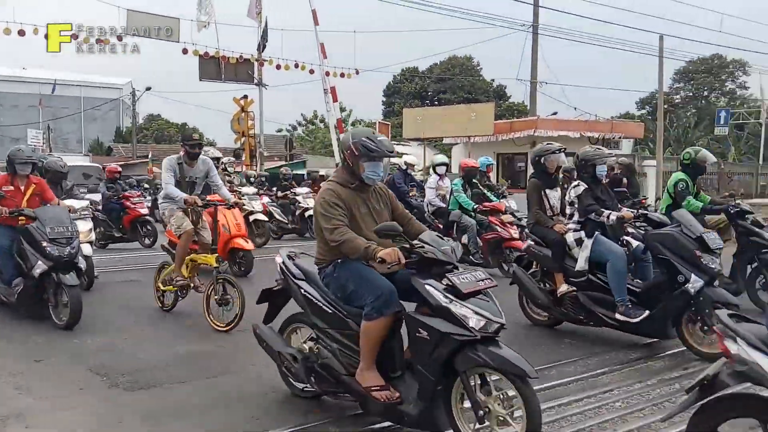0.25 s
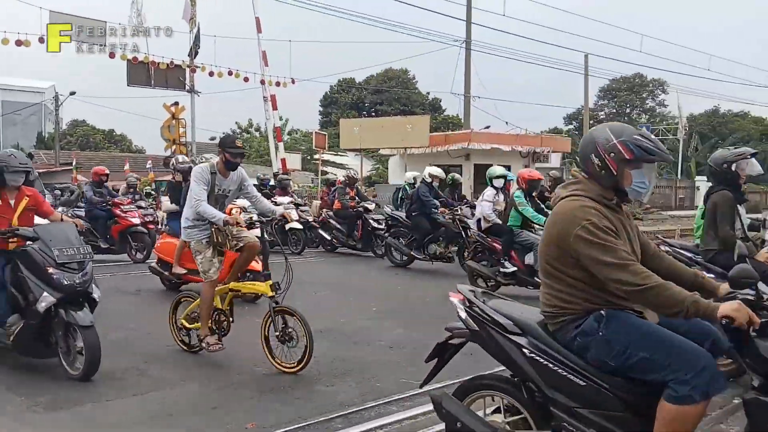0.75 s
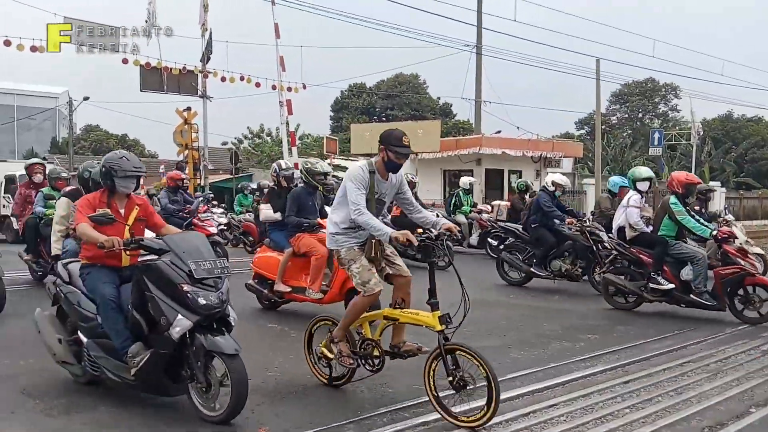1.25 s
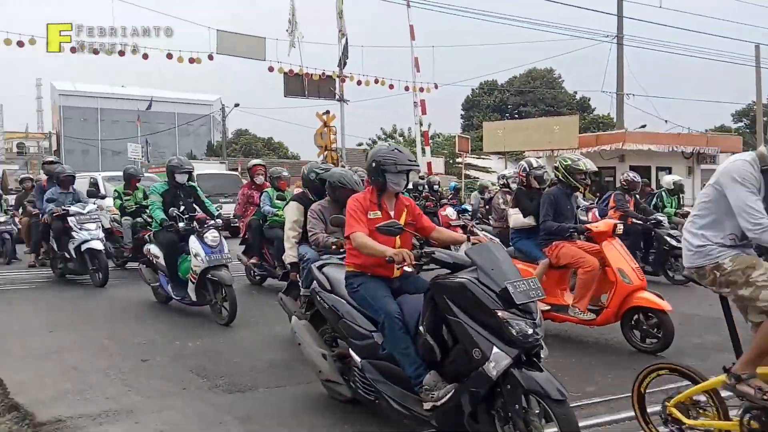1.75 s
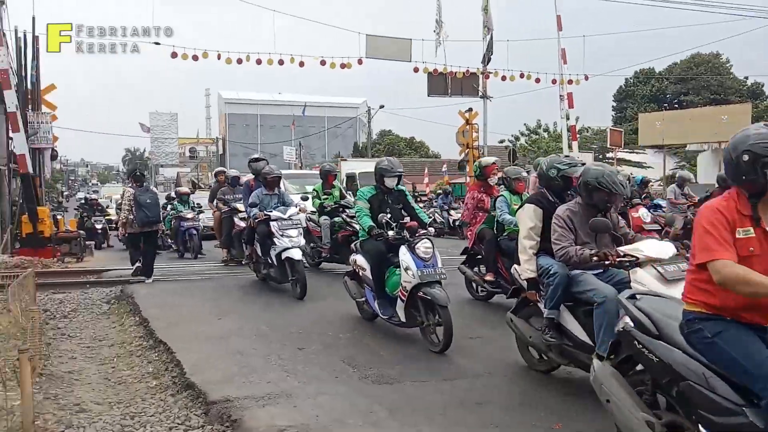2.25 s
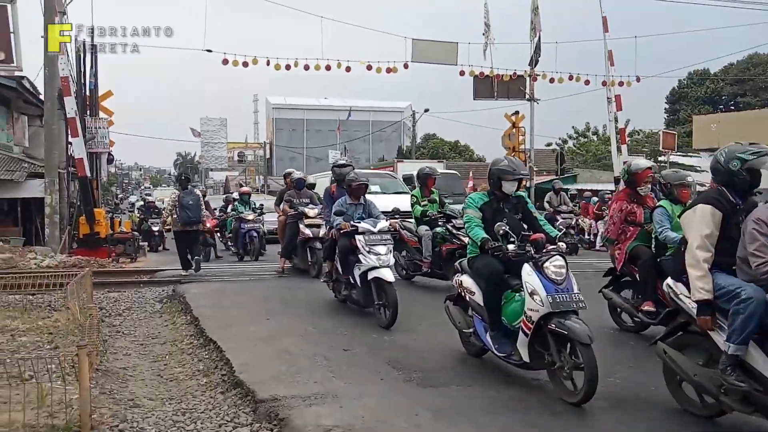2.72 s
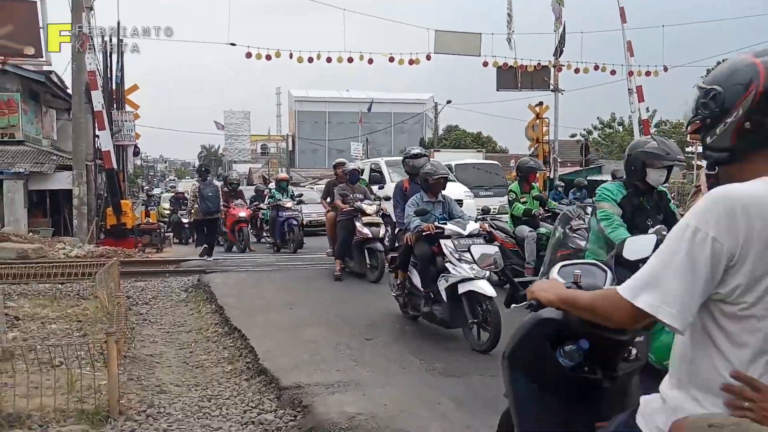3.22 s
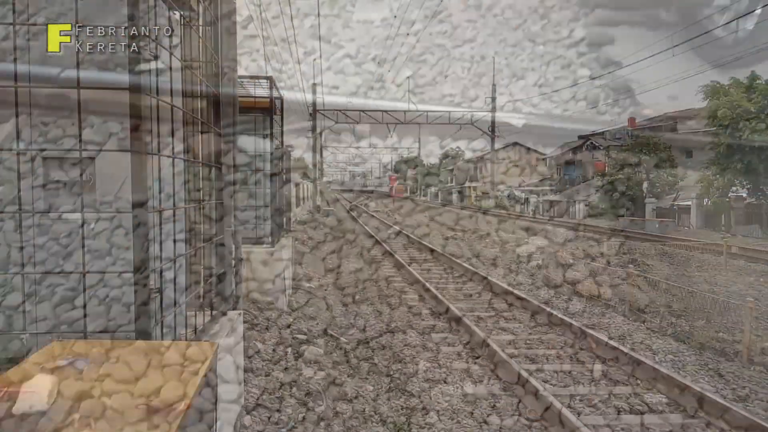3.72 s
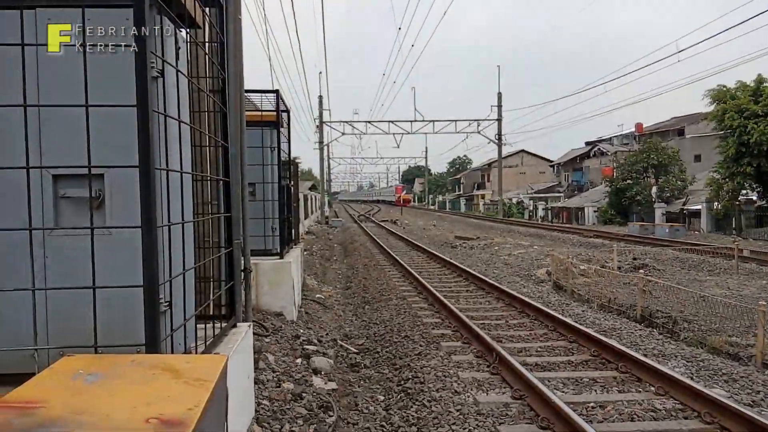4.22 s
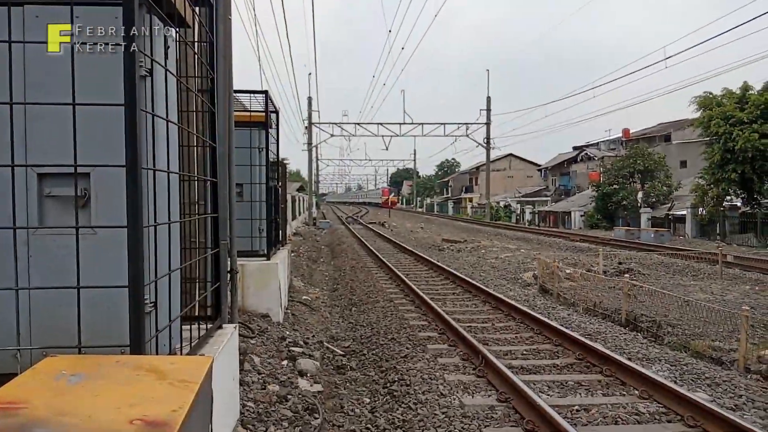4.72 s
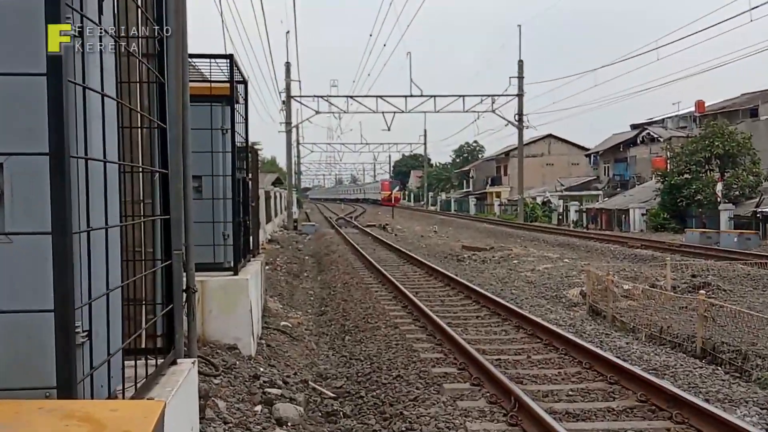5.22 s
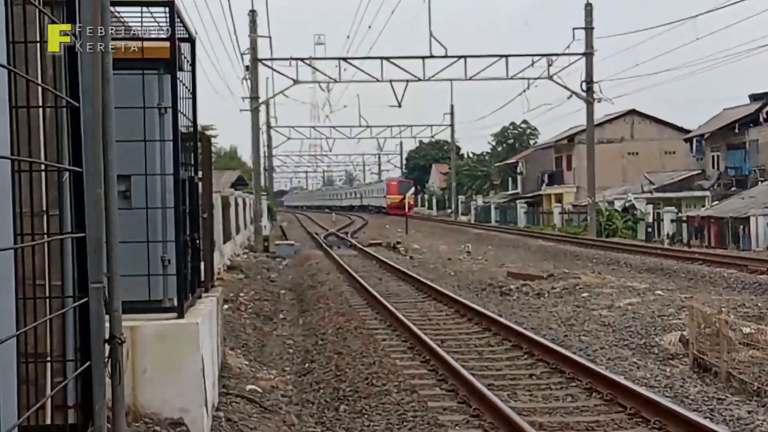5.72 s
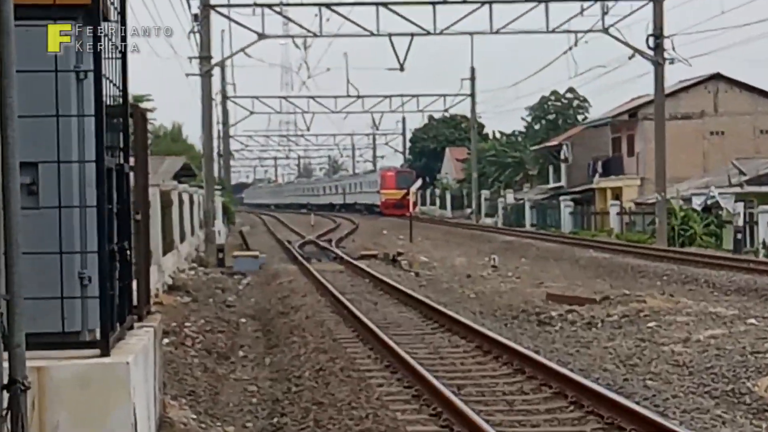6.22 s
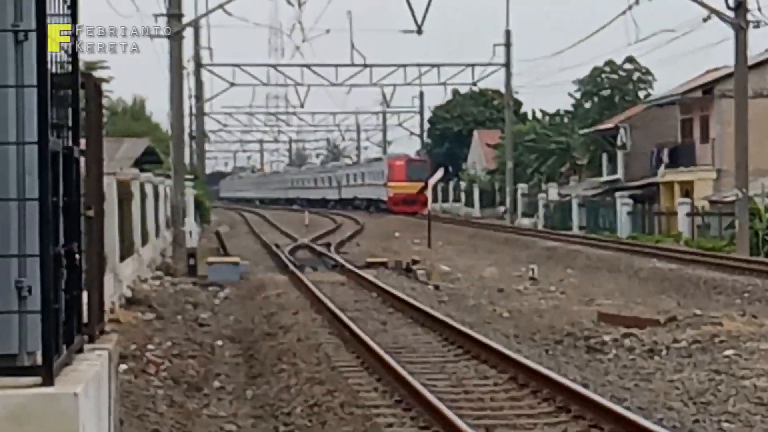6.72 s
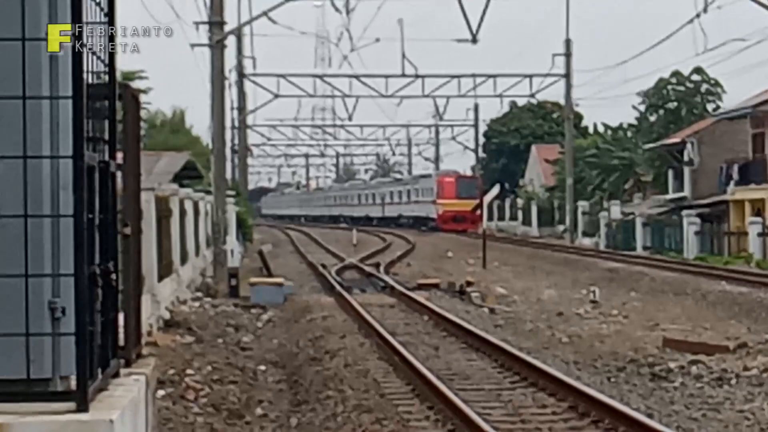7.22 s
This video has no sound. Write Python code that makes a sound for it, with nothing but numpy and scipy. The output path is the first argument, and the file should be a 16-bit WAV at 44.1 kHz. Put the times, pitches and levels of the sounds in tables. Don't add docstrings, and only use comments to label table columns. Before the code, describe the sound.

Dense scooter traffic buzzes past with hissing belts and small squeaks, cuts out briefly, then a deep thumping motorcycle engine idles and opens up.

```python
import sys
import numpy as np
from scipy import signal
from scipy.fft import rfft, irfft
from scipy.io import wavfile
from scipy.ndimage import uniform_filter1d

SR = 44100
rng = np.random.default_rng(int(sys.argv[2]) if len(sys.argv) > 2 else 0)


def bounce(signal):
    frames = np.transpose(np.atleast_2d(signal))
    limited = np.clip(frames, -1, 1)
    pcm = np.round(limited * 32767).astype(np.int16)
    wavfile.write(sys.argv[1], SR, pcm)


def rack_gain(trim_db):
    fader = np.asarray(trim_db, float)
    return 10 ** (fader / 20)


N = 328879
T = np.arange(N) / SR
CHANGE_S, BACK_S = 3.716, 3.802
FADE_IN_BASS_DB, FADE_IN_HISS_DB, FADE_IN_S = -22, -27, .095


def unit(x):
    return x / np.sqrt(np.mean(x ** 2))


def column(table, index):
    return np.interp(T, [row[0] for row in table], [row[index] for row in table])


def fade(start_s, end_s, edge_s):
    return np.clip(np.minimum(T - start_s, end_s - T) / edge_s + 1, 0, 1)


def fade_in(depth_db):
    return depth_db * np.exp(-np.maximum(T - BACK_S, 0) / FADE_IN_S) * (T > CHANGE_S)


def walk(rate_hz):
    hold = int(SR / rate_hz)
    steps = np.repeat(rng.standard_normal(N // hold + 1), hold)
    return unit(uniform_filter1d(uniform_filter1d(steps, hold), hold)[:N])


def ring(x, hz, t60_s):
    r, w = np.exp(-np.log(1000) / (t60_s * SR)), 2 * np.pi * hz / SR
    return signal.lfilter([0, r * np.sin(w)], [1, -2 * r * np.cos(w), r * r], x)


def puff(x, tail_s):
    return signal.lfilter([1], [1, -np.exp(-1 / (tail_s * SR))], x)


def cycles(hz, firing_s):
    phase = np.cumsum(hz) / SR
    return phase - phase[int(firing_s * SR)] + 200


def firings(phase, scatter_db):
    size = rack_gain(scatter_db * rng.standard_normal(size=1000))
    turns = np.diff(np.floor(phase), prepend=np.floor(phase[0]))
    return turns * size[phase.astype(int) % len(size)]


def rattle(pulses, colour, tail_s):
    breath = puff(pulses, tail_s) * rng.standard_normal(N)
    mix = sum(rack_gain(db) * unit(ring(breath, hz, t60_s)) for hz, t60_s, db in colour)
    dull_hz = min(1.5 * colour[-1][0], 16000)
    return unit(signal.sosfilt(signal.butter(2, dull_hz, fs=SR, output="sos"), mix))


BASS_LAG_S, MODE_SCATTER_DB = 0.00588, 2


def scooter(phase, pipe, scatter_db=2.5, tail_db=0):
    pulses, out = firings(phase, scatter_db), 0
    for sign, (hz, t60_s, db) in zip([1, 1, 1, -1, 1], pipe):
        push = puff(pulses * firings(phase, MODE_SCATTER_DB), 0.00035)
        late = np.roll(push, int(BASS_LAG_S * 100 / hz * SR))
        gain = sign * rack_gain(db + tail_db * (sign < 0))
        out = out + gain * ring(late, hz, t60_s) * rack_gain(1.48 * walk(9))
    return unit(out), pulses


# frequency in Hz, t60 in s, level in dB.
SMALL_PIPES = [
    [(128.2, 0.07, -6.5), (161, 0.033, 1.5), (224.3, 0.058, 0.5), (356.6, 0.086, -2.5), (465, 0.029, -8)],
    [(128, 0.027, -4.5), (169, 0.055, 3.5), (262, 0.024, -14.5), (369.4, 0.089, -1.5), (536, 0.024, -10)],
    [(109, 0.04, -38), (182.3, 0.12, 5), (214.3, 0.12, 0), (406, 0.12, -18), (500, 0.16, -13)],
    [(110, 0.024, -26), (136, 0.25, -21), (201.6, 0.04, 11.5), (330, 0.2, 8.5), (477, 0.078, -4.5)],
]
# time in s, level in dB.
CROWD_NEARNESS = [
    [(0, 4), (.6, -3), (.95, 0.5), (1.5, -0.5), (2.1, -3.5), (2.5, -2), (3.5, -5), (3.72, -9.5)],
    [(3.8, 6.5), (4.2, 3.5), (4.65, 3.5), (4.8, -5), (5.5, -2.5), (6.25, 0), (6.6, -5), (6.9, -1.5),
     (7.46, 1)],
]
# frequency in Hz, density in dB per Hz.
CROWD_COLOUR = [
    [(25, -33), (60, -19), (100, 5.5), (200, 5.5), (520, -13.5), (650, -11), (1140, -11), (1650, -16.5),
     (3600, -15.5), (4400, -7.5), (5100, -9.5), (6400, -6.5), (8000, -22.5), (9200, -20.5), (15600, -36)],
    [(25, -25), (60, -43), (100, 19), (200, 14.5), (520, 0), (900, -5), (1300, -13), (2120, -10.5),
     (3300, -16), (4500, -11.5), (5500, -12), (6500, -8.5), (8000, -21.5), (10000, -19), (15600, -39)],
]
# level in dB of exhausts, of tyres and gears, of belts and fans, of air; one row per scene.
LAYER_DB = [
    (-20.5, -35, -29, -44),
    (-22.5, -42.5, -42.5, -52),
]
LAYER_SHARE = (0.076, 0.24, 0.88, 0.39)


def crowd():
    beats, ticks = 0, 0
    for k, (speed, size) in enumerate(rng.random(size=(7, 2))):
        pipe = [(hz * (0.799 + 0.29 * size), min(t60_s, .07), db) for hz, t60_s, db in SMALL_PIPES[k % 4]]
        rate_hz = (20 + 22 * speed) * (1 + .05 * walk(1.2))
        tone, pulses = scooter(np.cumsum(rate_hz) / SR, pipe, 1.6)
        near = rack_gain(1.5 * walk(1.4))
        beats, ticks = beats + near * tone, ticks + near * pulses
    loose_db = 1.7 * np.minimum(rng.exponential(size=N), 3.5)
    ticks = ticks + (rng.random(N) < 120 / SR) * rack_gain(loose_db) * 0.55
    shake = unit(1 + .3 * puff(ticks, 0.01)) * rack_gain(0.6 * walk(7))

    out, log_hz = 0, np.log(np.fft.rfftfreq(N, 1 / SR) + 1)
    white = rfft(rng.standard_normal(N))
    bands = np.log([[1, 560], [560, 3000], [3000, 8200], [8200, SR]])
    scenes = [T < CHANGE_S, T > CHANGE_S]
    for nearness, colour, layer_db, on in zip(CROWD_NEARNESS, CROWD_COLOUR, LAYER_DB, scenes):
        colour_hz, colour_db = np.transpose(colour)
        spectrum = white * rack_gain(np.interp(log_hz, np.log(colour_hz), colour_db))
        layers = []
        for low, high in bands:
            window = np.clip(np.minimum(log_hz - low, high - log_hz) / 0.28 + .5, 0, 1) ** .5
            layers.append(unit(irfft(spectrum * window, N)))
        rumble, *hiss = layers
        near_db = column(nearness, index=1)
        bass_db, *hiss_db = (db + share * near_db for db, share in zip(layer_db, LAYER_SHARE))
        part = unit(unit(beats) + 0.68 * rumble) * rack_gain(bass_db + fade_in(FADE_IN_BASS_DB))
        for band, db in zip(hiss, hiss_db):
            part = part + band * shake * rack_gain(db + fade_in(FADE_IN_HISS_DB) + 0.6 * walk(15))
        out = out + part * on
    return out


# frequency in Hz, t60 in s, level in dB.
IDLER_BELT = [
    (2400, 0.0033, -4.5),
    (5040, 0.0021, 0),
    (6270, 0.0039, 2),
    (9300, .001, -16),
]
# time in s, peak in dB.
IDLER_SLAPS = [(3.9245, -31), (4.0128, -22.5), (4.0981, -20), (4.1335, -19.5), (4.1774, -20.5),
               (4.2168, -30), (4.2552, -19.5), (4.2936, -24), (4.3345, -20.5), (4.3694, -32),
               (4.408, -24.5), (4.429, -25.5), (4.4877, -20), (4.5226, -27), (4.5585, -23), (4.588, -28)]


def waiting_belt():
    slaps = np.zeros(N)
    for s, db in IDLER_SLAPS:
        slaps[int(s * SR)] = rack_gain(db)
    return rattle(slaps, IDLER_BELT, tail_s=0.022) * rack_gain(-48.5)


# in and out in s, firing rate on arrival and at cruise in Hz, level in dB.
PASSERS = [
    (0.4, 1.75, 38, 41.2, -24),
    (-6, 1.2, 37, 33.6, -32.5),
    (1.3, 1.75, 28, 33.5, -26.5),
    (2.2, 2.36, 31, 30, -26),
    (3.38, 3.54, 30, 33, -27),
    (2.8, 3.1, 33, 35, -29),
]
# time in s, level in dB.
TAIL_TURN = [(.3, -10), (.55, 4), (.8, 1.5), (1.05, 3.5), (1.3, -2), (1.55, -1.5), (1.9, 1), (2.02, -1),
             (2.12, 1), (2.25, -2), (2.4, -2), (2.55, -4.5), (2.8, 0), (3, 0), (3.12, -3), (3.3, -1),
             (3.45, -7), (3.6, 4)]
# frequency in Hz, t60 in s, level in dB.
BELT = [
    (4310, 0.014, 0.5),
    (5870, 0.0096, 4.5),
]
PULL_S, PASS_EDGE_S = .35, 0.16


def passers():
    out = np.zeros(N)
    pipes = [SMALL_PIPES[1]] + len(PASSERS) * [SMALL_PIPES[2]]
    for (start_s, end_s, first_hz, cruise_hz, db), pipe in zip(PASSERS, pipes):
        rate_hz = cruise_hz + (first_hz - cruise_hz) * np.exp(-np.maximum(T - start_s, 0) / PULL_S)
        same_scene = (T < CHANGE_S) == (start_s < CHANGE_S)
        tone, _ = scooter(cycles(rate_hz, start_s), pipe, 1.8, column(TAIL_TURN, index=1))
        out += tone * rack_gain(db) * fade(start_s, end_s, PASS_EDGE_S) * same_scene
    slaps = firings(cycles(34.7 + 0 * T, firing_s=.6402), 2.2)
    return out + rattle(slaps, BELT, .007) * rack_gain(-34) * fade(.3, 1.05, 0.2)


# time in s, firing rate in Hz.
LATE_REVS = [
    (5.6, 28.2),
    (5.85, 29.3),
    (6.15, 31.8),
    (6.48, 32.52),
    (6.65, 34.47),
    (6.8, 36.63),
    (7, 37.18),
    (7.46, 37.5),
]
# frequency in Hz, t60 in s, level in dB.
LATE_PIPE = [
    (110, .04, -8),
    (194, 0.049, 4.5),
    (259, 0.059, -5),
    (338.3, 0.13, -1),
    (490, 0.06, -4.5),
]
# frequency in Hz, t60 in s, level in dB.
RASP = [
    (1570, 0.0035, -0.5),
    (2070, 0.0065, 3),
    (3220, 0.0017, -1.5),
]
# frequency in Hz, t60 in s, level in dB.
PUFF = [
    (3830, 0.0034, 0),
    (5000, 0.0023, 0),
    (6400, .002, -3),
]


def late_scooter():
    phase = cycles(column(LATE_REVS, index=1), firing_s=6.4837)
    heard = rack_gain(-23) * fade(6.7, 7.6, 0.29) + rack_gain(-32) * fade(5.55, 6.44, 0.19)
    out = scooter(phase, LATE_PIPE, 2.3)[0] * heard
    for colour, tail_s, start_s, end_s, db in [(RASP, .004, 6.55, 8.6, -45.5),
                                               (PUFF, .003, 6.75, 7.5, -47.5),
                                               (RASP[1:], .003, 5.6, 6.4, -55),
                                               (RASP[:2], .003, 6.98, 7.06, -45)]:
        out += rattle(firings(phase, 2.2), colour, tail_s) * rack_gain(db) * fade(start_s, end_s, 0.2)
    return out


# time in s, firing rate in Hz.
NEAREST_REVS = [
    (1.5, 26.95),
    (1.8, 29.65),
    (2.1, 30.08),
    (2.7, 29.62),
    (3.15, 30.97),
    (3.72, 31.02),
]
# frequency in Hz, t60 in s, level in dB.
TAIL_PIPE = [
    (188, 0.076, 0),
    (243, 0.047, -3.5),
    (374, 0.1, 3),
    (440, .04, -15),
    (525, 0.077, -6),
]


def nearest_scooter():
    phase = cycles(column(NEAREST_REVS, index=1), firing_s=2.571)
    body, _ = scooter(phase, SMALL_PIPES[0], 0.97, column(TAIL_TURN, index=1))
    tail, _ = scooter(phase, TAIL_PIPE, 1.7)
    out = body * rack_gain(-20.5) * fade(1.68, 3.8, 0.38) + tail * rack_gain(-23.5) * fade(3.53, 3.8, 0.089)
    return out * (T < CHANGE_S)


# time in s, peak in dB, frequency in Hz.
SQUEAKS = [(0.489, -31, 8890), (0.636, -34, 9220), (0.878, -33, 8730), (0.95, -39, 9350),
           (1.298, -26.5, 9000), (1.535, -31.5, 8960), (1.715, -27.5, 8800), (2.0603, -25, 8950),
           (2.275, -27.5, 8800), (2.654, -29.5, 8600), (2.7935, -34, 8680), (3.013, -31, 9000),
           (3.065, -31.5, 8640), (3.408, -28, 8760)]
SQUEAK_S, LONGER_PER_DB = 0.023, .08


def squeaks():
    out = np.zeros(N)
    for s, db, hz in SQUEAKS:
        length_s = SQUEAK_S * np.exp(LONGER_PER_DB * (db + 30.5))
        t = np.arange(int(length_s * SR)) / SR
        slip = walk(1000)[:len(t)] * np.sin(np.pi * (t / t[-1]) ** 0.46)
        tone = np.sin(2 * np.pi * hz * (1.029 * t - 0.037 * t ** 2 / t[-1]))
        out[int(s * SR):][:len(t)] += rack_gain(db) * slip * tone
    return out


# start in s, length in s, first and last frequency in Hz, level in dB.
SQUEALS = [(.22, 0.32, 9400, 9900, -42), (.46, .07, 9650, 9450, -48), (.51, .12, 9650, 9750, -43),
           (.6, 0.14, 9400, 9250, -52), (2.2, 0.075, 12400, 12550, -39), (2.37, .04, 12200, 12350, -41),
           (2.4, 0.068, 12100, 11950, -40), (2.645, .05, 12700, 12850, -49), (2.81, .09, 11950, 12250, -54),
           (2.883, 0.077, 12300, 12200, -43), (2.93, 0.068, 12150, 11850, -41), (.55, .2, 1030, 1060, -44),
           (.77, .37, 1070, 1125, -39), (1.12, .2, 1125, 1160, -45)]


def squeals():
    out = np.zeros(N)
    for s, length_s, first_hz, last_hz, db in SQUEALS:
        done = np.clip((T - s) / length_s, 0, 1)
        hz = (first_hz + (last_hz - first_hz) * done ** 0.63) * (1 + 0.0062 * walk(200))
        tone = np.sin(2 * np.pi * np.cumsum(hz) / SR)
        out += tone * rack_gain(db - 0.5 + 2.5 * walk(60)) * np.sin(np.pi * done) ** 0.87
    return out


# time in s, level in dB, frequency in Hz, t60 in s.
KNOCKS = [(0.184, -41, 993, 0.12), (0.784, -33, 5800, .02), (2.283, -34, 5700, 0.043),
          (2.307, -31, 5000, 0.038), (3.495, -30, 6500, 0.012), (3.622, -36, 7000, 0.011),
          (3.66, -49, 6100, 0.012), (3.647, -44, 1020, 0.03), (3.698, -42, 1000, 0.03),
          (4.748, -43, 2100, .025), (4.75, -46, 2900, .015), (6.062, -46, 2200, .02),
          (6.16, -47, 2750, .02), (6.575, -41, 2170, 0.033), (7.342, -42, 3800, .015)]


def knocks():
    out = np.zeros(N)
    for s, db, hz, t60_s in KNOCKS:
        t = np.arange(int(t60_s * SR)) / SR
        blow = rng.standard_normal(len(t)) * np.exp(-7 * t / t60_s)
        out[int(s * SR):][:len(t)] += rack_gain(db) * (unit(ring(blow, hz, 0.48 * t60_s)) + 0.2 * unit(blow))
    return out


# time in s, peak in dB, decay in s.
CLICKS = [(2.283, -36, .003), (2.796, -38, .003), (3.135, -41, .003), (3.495, -27, .003),
          (3.614, -40, .002), (3.624, -20, .003), (3.66, -36, .003), (3.696, -35, 0.0045),
          (3.705, -17, 0.0047), (6.602, -40, .003), (6.855, -46, 0.0022)]
# frequency in Hz, t60 in s, level in dB.
CLICK = [
    (7000, 0.0003, 1),
    (13000, 0.00028, -10),
]


def clicks():
    out = np.zeros(N)
    for s, peak_db, decay_s in CLICKS:
        t = np.arange(int(5 * decay_s * SR)) / SR
        blow = rng.standard_normal(len(t)) * np.exp(-t / decay_s)
        burst = sum(rack_gain(db) * unit(ring(blow, hz, t60_s)) for hz, t60_s, db in CLICK)
        out[int(s * SR):][:len(t)] += rack_gain(peak_db) * burst / np.max(np.abs(burst))
    return out


# frequency in Hz, t60 in s, level in dB, polarity.
BIG_PIPE = [
    (94, .3, -12, -1),
    (164, .036, -10, -1),
    (194, .2, -17, -1),
    (234, .045, -10, 1),
    (330, .065, -12.5, 1),
    (540, .012, -18, 1),
    (442, .065, -14.5, 1),
    (580, .065, -20, 1),
    (735, .09, -23, 1),
    (855, .09, -33, 1),
]
# time in s, lowest, fourth, fifth and sixth mode in Hz.
PIPE_PITCH = [(3.8, 92.1, 427, 586, 740), (4.7, 92.9, 452, 597, 726), (4.95, 94.7, 438, 593, 717),
              (5.2, 94, 452, 600, 730), (5.45, 96, 454, 557, 682), (5.75, 94.8, 440, 550, 700),
              (6, 90.3, 470, 556, 697), (6.25, 95.2, 428, 540, 725), (6.5, 103.7, 455, 554, 756),
              (6.75, 104.9, 465, 594, 764), (7.05, 105, 454, 585, 745), (7.46, 106.4, 462, 587, 750)]
# time in s, third, fourth, fifth, sixth and top mode in dB.
PIPE_TURN = [(3.8, -2, -5, 2, -2, -3), (4.7, 2.5, 0.5, 0.5, 0, 3), (4.95, -0.5, -0.5, 1.5, -7, -6),
             (5.25, 0, 5.5, -6, 1.5, -10), (5.5, -0.5, 0, 4, -7, -5), (5.75, 0, -2, 4, -13, 1),
             (6, 1.5, 5.5, -3, -13, 5), (6.12, 1.5, -1.5, -2, -6, 10), (6.3, 2.5, 0, 0, 1.5, 10),
             (6.5, 3.5, -5, -1, 0, 14), (6.75, 2, -7, 1, 4, 9), (7.05, -2.5, -5, -4, 1, 14),
             (7.46, 5, 3.5, -4, -2, 1)]
BASS_LAG_BIG_S, TOP_LAG_S = .0031, .0004
HOT_FROM_HZ, SING_DB_PER_HZ, IDLE_THUD_DB, BIG_SCATTER_DB = 19.9, 1.2, -7, 1.


def big_exhaust(pulses, rate_hz, throttle, bark_db, level_db):
    hz, t60_s, db, sign = np.transpose(BIG_PIPE)[:, :, None]
    t = np.arange(SR // 4) / SR
    after_s = np.maximum(t - BASS_LAG_BIG_S * (96 / hz) ** .37 - TOP_LAG_S * (hz > 600), 0)
    octaves = np.maximum(np.log2(hz / 240), 0)
    low, fourth, fifth, sixth = (column(PIPE_PITCH, index=k) / hz[mode, 0]
                                 for k, mode in [(1, 0), (2, 6), (3, 7), (4, 8)])
    turn_db = np.array([column(PIPE_TURN, index=k) for k in range(1, 6)])
    hot_hz = np.maximum(rate_hz - HOT_FROM_HZ, 0)
    thud_db = IDLE_THUD_DB * np.clip(1 - throttle / .35, 0, 1) ** .5
    groups = [hz < 300, hz < 350, hz < 500, hz == hz[7]]
    body = np.zeros(N + SR)
    for i in np.flatnonzero(pulses):
        third = max(1.02 * low[i], fourth[i])
        heat = np.select(groups, [low[i], third, fourth[i], fifth[i]], sixth[i])
        mode_db = db + octaves * bark_db[i] + level_db[i]
        mode_db = mode_db + SING_DB_PER_HZ * hot_hz[i] * (hz == hz[2]) + thud_db[i] * (t60_s < .05)
        mode_db = mode_db + BIG_SCATTER_DB * octaves * rng.standard_normal(hz.shape)
        mode_db[[4, 6, 7, 8, 9], 0] += turn_db[:, i]
        decay = np.exp(-np.log(1000) * after_s * heat / t60_s)
        modes = sign * rack_gain(mode_db) * decay * np.sin(2 * np.pi * after_s * hz * heat)
        body[i:i + SR // 4] += pulses[i] * np.sum(modes, axis=0)
    return signal.sosfilt(signal.butter(6, 1050, fs=SR, output="sos"), body[:N])


# frequency in Hz, t60 in s, level in dB.
POP = [
    (1500, .022, 0),
    (2150, .012, -6),
]
# time in s, pop level in dB.
POP_LEVEL = [
    (4.68, -60),
    (4.78, -31),
    (5.3, -31),
    (5.5, -37),
    (5.95, -33),
    (6.2, -34),
    (6.6, -41),
    (7.46, -44),
]


def exhaust_pops(phase):
    pops = np.roll(firings(phase, 1.5), int(.0085 * SR)) * rack_gain(column(POP_LEVEL, index=1))
    return sum(rack_gain(db) * ring(pops, hz, t60_s) for hz, t60_s, db in POP)


# frequency in Hz, t60 in s, level in dB.
GAS = [
    (1760, 0.0031, 9.5),
    (5650, 0.0008, 19),
]
# frequency in Hz, t60 in s, level in dB.
GAS_JET = [
    (14900, .0007, 0),
]
PUFF_ECHO_S, PUFF_ECHO_DB = .007, -1


def gas_puffs(phase, gas_db):
    puffs = firings(phase - .085, 2.)
    puffs = puffs + rack_gain(PUFF_ECHO_DB) * np.roll(puffs, int(PUFF_ECHO_S * SR))
    jets = rattle(firings(phase - .03, 4), GAS_JET, .0015)
    return rattle(puffs, GAS, 0.006) * rack_gain(gas_db) + jets * rack_gain(-65) * fade(6.05, 8.6, 0.45)


# frequency in Hz, t60 in s, level in dB.
CLATTER = [
    (2430, 0.0046, 1.5),
    (4670, 0.00082, 8),
    (6060, 0.0018, 7),
]


def tappets(phase, clatter_db):
    ticks = firings(2 * phase - .85, 1.8)
    return rattle(ticks, CLATTER, 0.01) * rack_gain(clatter_db + fade_in(FADE_IN_HISS_DB))


# time in s, firing rate in Hz.
BIG_REVS = [(3.88, 12.51), (4.66, 12.36), (4.74, 18.57), (4.85, 19.57), (5.15, 20.16), (5.3, 17.98),
            (5.45, 16.55), (5.75, 15.58), (5.9, 17.71), (6.2, 19.2), (6.7, 23.01), (7.46, 23.03)]
# time in s, throttle 0 to 1, level in dB.
THROTTLE = [
    (3.8, 0, 2),
    (4.65, 0.03, 1.5),
    (4.75, 0.9, -0.5),
    (5.3, 0.8, 0.5),
    (5.85, 0.65, 1),
    (6.05, 0.94, 1),
    (6.38, 0.71, 3),
    (6.6, 0.4, 1.5),
    (6.8, 0.6, 2.5),
    (7.46, 0.64, -1.5),
]
BARK_DB, GAS_DB, CLATTER_DB = (-19.5, -1.5), (-62.5, -46.5), (-43, -49.5)


def big_single():
    rate_hz = column(BIG_REVS, index=1)
    phase = cycles(rate_hz, firing_s=3.885)
    on = T > CHANGE_S
    throttle = column(THROTTLE, index=1)
    level_db = column(THROTTLE, index=2) + fade_in(FADE_IN_BASS_DB)
    bark_db, gas_db, clatter_db = (shut + (wide - shut) * throttle for shut, wide in (BARK_DB, GAS_DB, CLATTER_DB))
    body = big_exhaust(firings(phase, 0.22) * on, rate_hz, throttle, bark_db, level_db)
    return body + (exhaust_pops(phase) + gas_puffs(phase, gas_db) + tappets(phase, clatter_db)) * on


def scene():
    traffic = crowd() + waiting_belt()
    scooters = passers() + late_scooter() + nearest_scooter()
    metal = squeaks() + squeals() + knocks() + clicks()
    return (traffic + scooters + metal + big_single())[None]


def top_cut(x):
    return signal.sosfilt(signal.butter(12, 15710, fs=SR, output="sos"), x)


def record(dry):
    x = signal.sosfilt(signal.butter(4, 80, "high", fs=SR, output="sos"), dry)
    x = np.tanh(x / 0.73) * 0.69
    x = x * np.clip(np.maximum(CHANGE_S - T, (T - BACK_S) / 4) / 0.0025, 0, 1)
    x = signal.sosfilt(signal.butter(4, 28, "high", fs=SR, output="sos"), x)
    x = signal.sosfilt(signal.ellip(8, .2, 70, 15700, fs=SR, output="sos"), x)
    return top_cut(x)


dry = scene()
out = record(dry)
bounce(out)
```